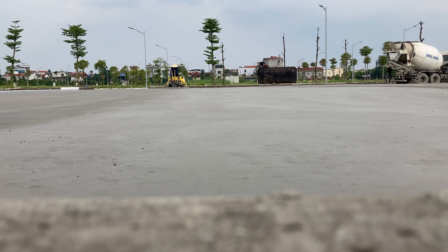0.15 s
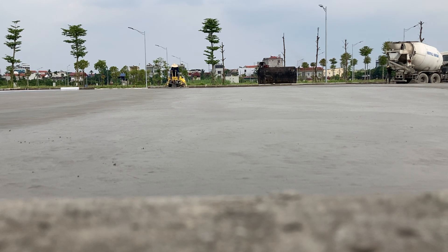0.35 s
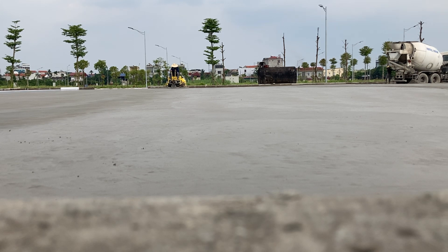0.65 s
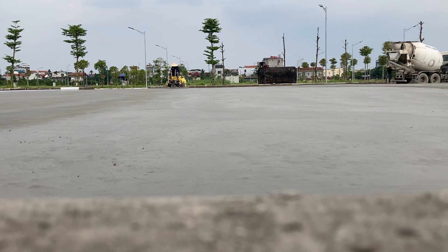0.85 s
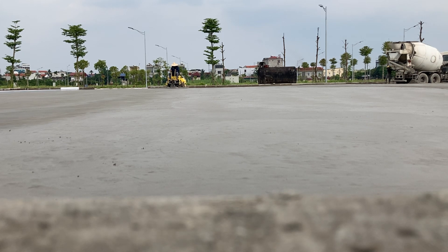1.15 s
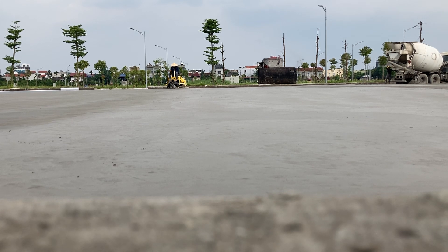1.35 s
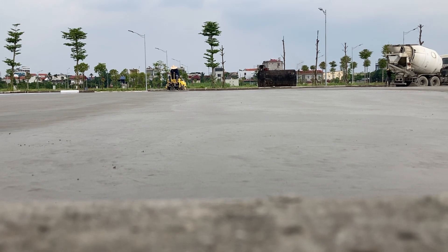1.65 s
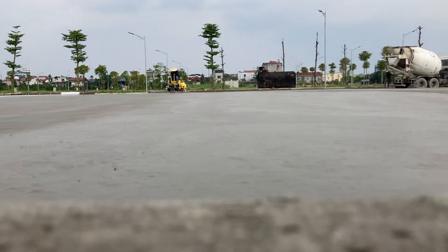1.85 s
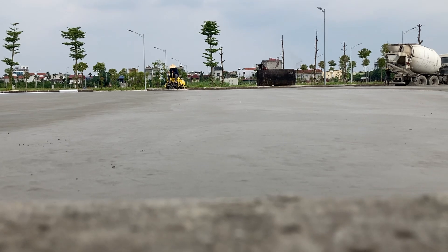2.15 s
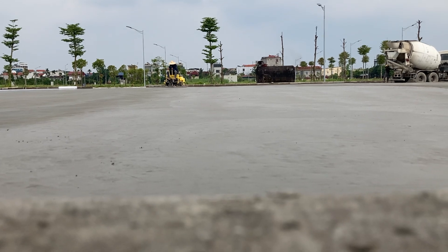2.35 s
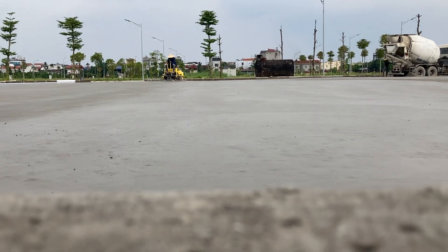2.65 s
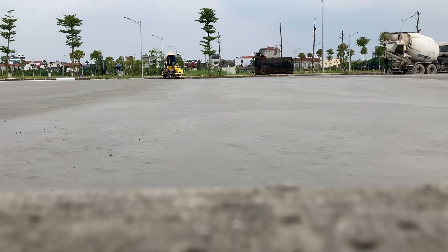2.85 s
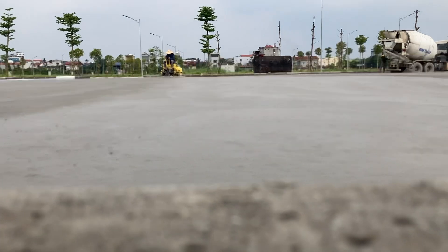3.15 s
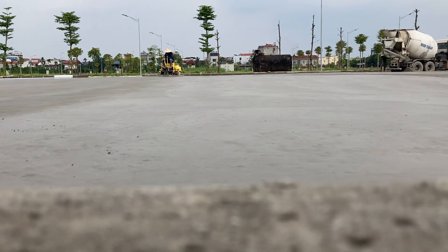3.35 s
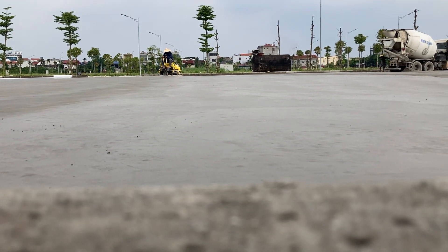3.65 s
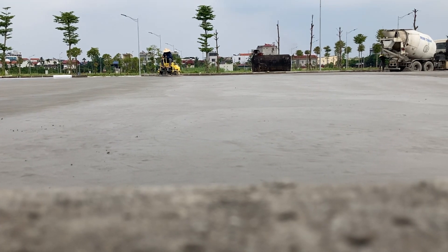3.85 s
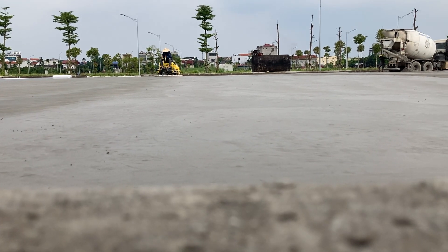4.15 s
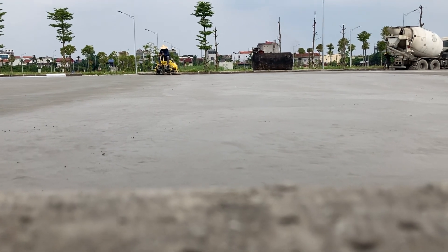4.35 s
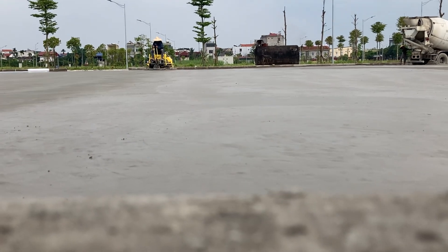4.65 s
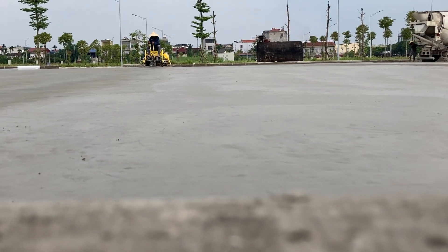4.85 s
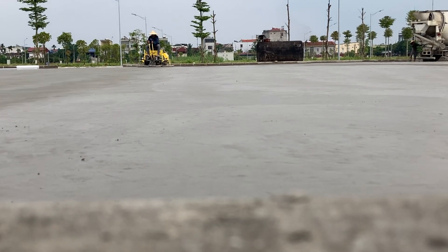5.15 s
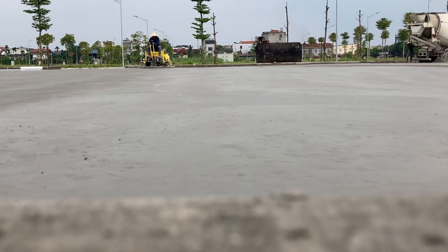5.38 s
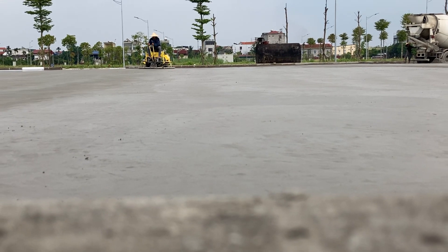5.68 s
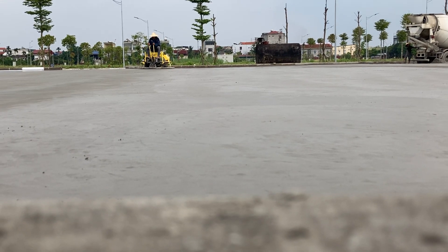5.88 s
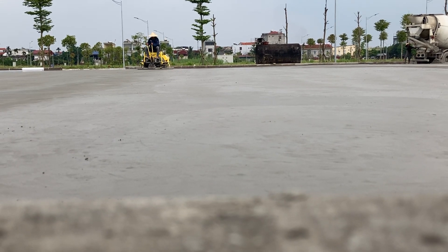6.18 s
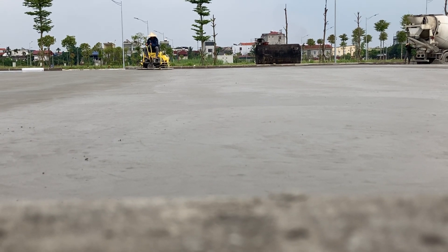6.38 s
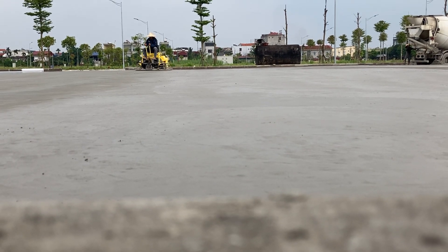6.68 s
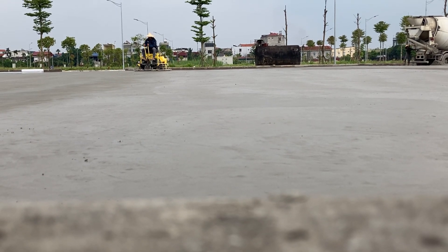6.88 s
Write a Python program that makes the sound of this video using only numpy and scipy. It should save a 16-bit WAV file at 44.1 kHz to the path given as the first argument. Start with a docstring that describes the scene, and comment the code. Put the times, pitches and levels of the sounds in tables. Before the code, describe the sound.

Outdoors on a wide concrete slab, a mixer lorry's diesel idles continuously with a low throb, broad roar, quick valve ticks and loose steel rattle. A ride-on trowel farther away adds a small-engine drone, a wavering whine and thin scraping hiss. Two brief rustles pass early; a hard slump with lumps knocking the drum comes just after two seconds, softer ones after four and six. Stereo microphone, low and distant.

```python
"""A ride-on trowel works a concrete slab far off: engine drone, a wavering pump whine, scraping blades.
From the start a mixer lorry idles nearer by: diesel throb and roar, valve ticks and rattling steel.
Around one second the mix slumps, and the roar's colour changes over the next second. Two rustles pass.
Just after two seconds the mix slumps hard and lumps knock on the drum; more follow after four and six.
Tones, shaped noises and decaying rings make it all; two microphone ports hear it, the left mostly late."""
import sys
import numpy as np
from scipy import signal
from scipy.fft import rfft, irfft, next_fast_len
from scipy.io import wavfile
from scipy.ndimage import uniform_filter1d, map_coordinates

SR = 44100
rng = np.random.default_rng(int(sys.argv[2]) if len(sys.argv) > 2 else 0)


def unload_wav(signal):
    """Save mono or channel-first audio to the path in sys.argv[1] as 16-bit WAV at rate SR, clipped to [-1, 1]."""
    wavfile.write(
        sys.argv[1],
        SR,
        np.round(np.clip(np.atleast_2d(signal).T, -1, 1) * 32767).astype(np.int16),
    )


N = 309582

# trowel levels over time: time [s], drone_level [dB], whine_change [dB]
TROWEL_LEVELS = [(0, -36.5, 5.5), (1.0, -35.5, 3.5), (1.1, -37, 3.5), (1.35, -41, 1), (1.5, -34, -10),
                 (1.65, -37.5, 1), (2.03, -40, 2), (2.09, -39, -3), (2.3, -38.5, -4), (2.5, -35.5, -1.5),
                 (2.8, -38.5, 1.5), (3.0, -42, 0.5), (3.2, -41, -1.5), (3.42, -39, -6), (3.65, -42, -0.5),
                 (3.82, -41, -3.5), (4.2, -36, 1.5), (4.65, -40.5, 0), (5.0, -35, 2), (5.4, -41, -1),
                 (5.55, -38, -0.5), (6, -40, -0.5), (6.38, -39, 0.5), (6.5, -41, -5.5), (7.02, -38, -1)]
# levels of the broad noises: time [s], roar_level [dB], scrape_level [dB]
NOISE_LEVELS = [(0, -36.5, -50.5), (1.2, -36, -48.5), (1.75, -36, -45.5), (2.6, -35.5, -45.5),
                (3.5, -36, -46.5), (4.35, -36, -45), (4.6, -35.5, -46.5), (5.1, -35.5, -45),
                (6.1, -35, -47.5), (6.45, -35.5, -45), (7.02, -36, -45.5)]
# colour of the scraping blades, also lent to the slumps' hiss: pitch [Hz], relative_level [dB per Hz]
SCRAPE_COLOUR = [(3500, -20), (5000, -1), (6000, -3), (7500, 0), (8700, -1.5), (10000, -4), (12000, -6),
                 (13300, -10), (14400, -13.5), (15800, -14.5)]
# colour of the later roar, its dips set lower by the ground echo, also lent to the slumps' rush:
# pitch [Hz], relative_level [dB per Hz]
LATER_ROAR_COLOUR = [(500, -10), (650, 2.5), (765, -4.5), (850, 1.5), (1150, -2), (1450, 1), (1620, -13.5),
                     (1800, -4), (2050, -4.5), (2280, -10), (2480, -8.5), (3000, -9.5), (4300, -9),
                     (4800, -56), (6500, -17)]


def amp(db):
    """Turn decibels into a gain."""
    return 10 ** (np.asarray(db) / 20)


def unit(x):
    """Scale a sound to rms 1."""
    return x / np.sqrt(np.mean(x ** 2) + 1e-20)


def along(points, hz):
    """Read a curve of (Hz, value) points, joined by straight lines on a log pitch axis."""
    point_hz, values = np.transpose(points)
    return np.interp(np.log(hz + 1), np.log(point_hz + 1), values)


def curves(rows):
    """Join the rows over time: one value per sample for each column after the time."""
    time_s, *columns = np.transpose(rows)
    return [np.interp(np.arange(N) / SR, time_s, column) for column in columns]


def wobble(rate):
    """Draw a smooth random curve with this many knots a second."""
    knots = rng.standard_normal(int(N * rate / SR) + 4)
    return map_coordinates(knots, [np.arange(N) * rate / SR])


def filtered(x, response):
    """Multiply the spectrum of x by a complex response that depends on pitch."""
    length = next_fast_len(N + SR // 4)
    hz = np.fft.rfftfreq(length, 1 / SR)
    return irfft(rfft(x, length) * response(hz), length)[..., :N]


def noise(spectrum, patchy_db=2):
    """Make two unrelated patchy noises of one colour: the direct sound and what the site scatters."""
    low_edge = [(1, -120), (spectrum[0][0] * .7, -70)]
    high_edge = [(spectrum[-1][0] * 1.3, -70)]
    closed = low_edge + list(spectrum) + high_edge
    z = signal.stft(rng.standard_normal((2, N)), nperseg=1024)[2]
    # smoothing chance values over pitch and then time leaves patches of strength
    field = uniform_filter1d(rng.standard_normal(z.shape[1:]), size=4, axis=0)
    field = uniform_filter1d(field, size=5, axis=1)
    patchy = z * amp(patchy_db * unit(field))
    pair = signal.istft(patchy, nperseg=1024)[1][:, :N]
    return unit(filtered(pair, lambda hz: amp(along(closed, hz))))


def tone(hz, blur, flutter_db, rate, start=None):
    """Make a partial whose phase and size the air stirs: direct, and weaker scattered."""
    start = rng.random() if start is None else start
    phase = 2 * np.pi * (np.cumsum(hz) / SR + start) + blur * wobble(rate)
    size = np.sqrt(2) * amp(flutter_db * wobble(rate))
    return size * np.array([np.sin(phase), 0.72 * np.cos(phase + 3 * wobble(2.7))])


def trowel():
    """Drone with two engine orders; scrape with a restless hiss, low and high parts each on their own."""
    # small engine: time [s], firing_rate [Hz]
    firing = [(0, 63.3), (.9, 64.2), (1.2, 65.6), (1.6, 65), (1.95, 66.8), (2.3, 65.2), (2.9, 68.3),
              (3.4, 65.2), (3.9, 65.8), (4.3, 67), (5.4, 66.3), (5.8, 68), (7.02, 67.9)]
    second_order_db = -47
    hz = curves(firing)[0]
    drone_db = curves(TROWEL_LEVELS)[0]
    scrape_db = curves(NOISE_LEVELS)[1]
    drone = amp(drone_db) * tone(hz, blur=0.51, flutter_db=1.0, rate=9)
    drone = drone + amp(second_order_db) * tone(2 * hz, blur=0.52, flutter_db=2.5, rate=6.4)

    def grit():
        restless_db = 0.89 * wobble(17) + 0.84 * wobble(40) + 0.98 * wobble(400)
        return amp(restless_db) * noise(SCRAPE_COLOUR, patchy_db=2.5)

    def high_share(hz):
        return np.clip((hz - 7500) / 3000, 0, 1)

    low_hiss = filtered(grit(), lambda hz: np.sqrt(1 - high_share(hz)))
    high_hiss = filtered(grit(), lambda hz: np.sqrt(high_share(hz)))
    return drone + amp(scrape_db) * unit(low_hiss + high_hiss)


def piston_rates():
    """Let the pump's speed hunt: both rates swing smoothly between their turning points."""
    # turning points: time [s], piston_rate [Hz], rate of a second shaft that slips behind [Hz]
    turning_points = [(0, 188.8, 187), (.42, 194.3, 191), (0.76, 191.3, 189), (1.2, 199.6, 196.6),
                      (1.48, 197.7, 196.4), (1.92, 201.8, 198.8), (2.3, 196.9, 196.9), (2.85, 205.8, 203),
                      (3.42, 198.2, 197.2), (3.821, 198.7, 197.6), (4.24, 203, 199), (4.66, 198.8, 196),
                      (5.03, 202.4, 198.8), (5.37, 198.6, 196), (5.84, 205.8, 202.5), (6.24, 201.1, 197.8),
                      (6.63, 204.9, 201.3), (6.92, 201.8, 198.8), (7.02, 204, 199.5)]
    swing = 0.54  # how much the speed lingers at each turning point, 0-1
    time_s, *turning_hz = np.transpose(turning_points)
    points = np.arange(len(time_s))
    place = np.interp(np.arange(N) / SR, time_s, points)
    lingering = place - np.sin(2 * np.pi * place) / (2 * np.pi) * swing
    return [np.interp(lingering, points, hz) for hz in turning_hz]


def pump():
    """Sound multiples of the piston rate: a clear whine over fuzzier hums, two of them beating."""
    # the whine is loud only where its pitch meets a narrow resonance: whine_pitch [Hz], level [dB]
    resonance = [(1134, -51.5), (1156, -46.5), (1176, -51), (1185, -45), (1188, -44), (1193, -37.5),
                 (1209, -32.5), (1224, -35), (1236, -38)]
    # hums: time [s], level at 3x [dB], level at 2x of the slower shaft [dB], level at 12x [dB],
    # roughness [0-1]
    hum_levels = [(0, -37, -53, -55, 0.05), (.35, -36.5, -40, -52, 0.14), (.9, -36.5, -39.5, -53, 0.08),
                  (1.2, -42, -48, -45, 0.33), (1.5, -42.5, -48, -56, 0.24), (2, -42.5, -44.5, -48, 0.34),
                  (2.35, -42.5, -46.5, -58, 0.3), (2.9, -41, -37.5, -45, 0.16),
                  (3.3, -39.5, -46.5, -49, 0.37), (3.8, -43.5, -45, -51.5, 0.34),
                  (4.3, -40, -42.5, -47, 0.1), (4.7, -44.5, -47.5, -54, 0.4), (5.2, -40.5, -43, -52, 0.05),
                  (5.8, -42.5, -41.5, -54, 0.26), (6.4, -41.5, -44, -52, 0.1),
                  (7.02, -40, -45.5, -53.5, 0.4)]
    # the second shaft's hum joins after a second: time [s], level against the first shaft's [dB]
    second_shaft = [(0, -16), (.9, -16), (1.15, -1), (7.02, -1)]
    hz, slow_hz = piston_rates()
    third_db, second_db, high_db, rough = curves(hum_levels)
    slow_third_db = third_db + curves(second_shaft)[0]
    whine_db = along(resonance, 6 * hz) + curves(TROWEL_LEVELS)[1]

    whine = amp(whine_db) * tone(6 * hz, blur=0.4, flutter_db=1.0, rate=22)
    third = amp(third_db) * tone(3 * hz, blur=2.1 * rough, flutter_db=6.8 * rough, rate=25)
    slow_third = amp(slow_third_db) * tone(3 * slow_hz, blur=1.9 * rough, flutter_db=4.6 * rough, rate=25)
    slow_second = amp(second_db) * tone(
        2 * slow_hz, blur=0.62 + 1.0 * rough, flutter_db=1.5 + 6.1 * rough, rate=22)
    high = amp(high_db) * tone(12 * hz, blur=1.2, flutter_db=3.5, rate=140)
    return whine + third + slow_third + slow_second + high


def rustle():
    """Let grainy middle-band noise rise quickly and die away, once for each rustle."""
    # rustles: start [s], level [dB], time to fall 60 dB [s]
    events = [(.878, -41, .14), (1.48, -34.5, .3)]
    # pitch [Hz], relative_level [dB per Hz]
    rustle_colour = [(1200, -8), (1700, 0), (2200, 2), (2900, 2), (3800, 2.5), (4500, -12)]
    start_s, level_db, t60_s = np.transpose(events)[..., None]
    since_s = np.clip(np.arange(N) / SR - start_s, 0, None)
    grains = noise(rustle_colour) * amp(2.2 * wobble(150))
    swells = amp(level_db - 60 * since_s / t60_s) * (1 - np.exp(-since_s / 0.0087))
    return np.sum(swells, 0) * grains


def knocks():
    """Let each lump that strikes the drum wall give it one low, quickly damped swing."""
    # lumps: start [s], pitch [Hz], level before damping [dB], time to fall 60 dB [s]
    lumps = [(1.05, 72.4, -28, 0.16), (2.052, 72.5, -27, 0.1), (2.064, 420, -20, .03),
             (2.083, 125, -15, 0.04), (2.131, 297, -13, 0.05), (2.176, 135, -13, 0.05),
             (2.205, 278, -19, 0.066), (4.16, 330, -25, .1), (4.5, 590, -22, .04), (4.96, 335, -24, .1),
             (6.74, 66.25, -28, 0.2)]
    start_s, hz, level_db, t60_s = np.transpose(lumps)[..., None]
    since_s = np.clip(np.arange(N) / SR - start_s, 0, None)
    size = amp(level_db - 60 * since_s / t60_s) * (1 - np.exp(-since_s / 0.002))
    direct = np.sum(size * np.sin(2 * np.pi * hz * since_s), 0)
    return np.array([direct, 0.34 * direct])  # the second is the scattered share


def slumps():
    """Drop wet mix in the drum: a dull thud, a rush and a hiss under one swell."""
    # slumps: start [s], rise [s], time to fall 60 dB [s], then levels before the swell:
    # thud [dB], rush [dB], hiss [dB]
    drops = [(1.03, 0.033, 0.6, -26, -55, -62), (2.051, 0.014, 0.29, -22, -23.5, -30),
             (2.115, 0.013, 0.69, -30, -37, -50), (4.33, 0.068, 0.83, -30, -29.5, -54),
             (6.62, 0.068, 0.89, -26.5, -29, -56)]
    # pitch [Hz], relative_level [dB per Hz]
    thud_colour = [(40, -22), (70, -12), (150, -2), (250, 3), (330, 3), (450, 2), (900, -4), (1300, -20)]
    t = np.arange(N) / SR
    energy = np.zeros((3, N))
    for start_s, rise_s, t60_s, *levels_db in drops:
        since_s = np.clip(t - start_s, 0, None)
        swell = (1 - np.exp(-since_s / rise_s)) * amp(-60 * since_s / t60_s)
        energy += (amp(levels_db)[:, None] * swell) ** 2
    colours = (thud_colour, LATER_ROAR_COLOUR, SCRAPE_COLOUR)
    layers = sum(np.sqrt(e) * noise(colour) for e, colour in zip(energy, colours))
    return amp(0.83 * wobble(99)) * layers


def tick_rows():
    """List the loud ticks, and fill the turns between them with faint ones of chance size."""
    # loud valve ticks: start [s], snap_level [dB], ring_level [dB], both before the plate's colouring
    loud_ticks = [(0.0927, -38, -54), (0.4753, -41, -41), (0.626, -37, -50), (0.7323, -33, -43.5),
                  (0.8814, -39, -38), (1.0306, -40, -42), (1.1029, -38, -50), (1.1767, -41, -47),
                  (1.2498, -37, -36), (1.3229, -33, -49.5), (1.4229, -35, -44.5), (1.5429, -38, -48),
                  (1.616, -36, -42), (1.6881, -34, -45), (1.763, -32, -38), (1.836, -34, -38),
                  (1.9086, -33, -43.5), (2.0095, -40.5, -40), (2.0557, -43, -47), (2.2057, -37, -26),
                  (2.2783, -37, -33), (2.352, -36, -47), (2.427, -38, -32), (2.5002, -34, -28.5),
                  (2.6473, -36, -27.5), (2.7935, -33, -33), (3.038, -41, -36), (3.2313, -34, -46.5),
                  (3.3802, -44, -47), (3.6353, -43, -47), (3.9858, -44, -39), (4.3064, -50, -33.5),
                  (4.375, -38, -40), (4.4538, -33, -43), (4.5271, -43, -51), (4.6007, -35, -49),
                  (4.892, -38, -46), (4.9656, -35, -46), (5.04, -31, -43.5), (5.111, -35, -41),
                  (5.187, -30, -36), (5.26, -34, -44.5), (5.3329, -37, -48), (5.4051, -39, -50),
                  (5.6975, -40, -40), (5.775, -35, -38), (5.85, -35, -35), (5.9295, -40, -29.5),
                  (5.996, -33.5, -34), (6.2919, -44, -46), (6.3943, -35, -45.5), (6.4425, -35, -48.5),
                  (6.5146, -35, -39), (6.5896, -32.5, -38), (6.7416, -42, -36.5), (6.9865, -36.5, -53.5)]
    ticks_per_s = 13.62  # one a turn of the shaft
    faint_snap_db, faint_ring_db, faint_spread_db = -42, -50, 3.5
    loud_s = np.transpose(loud_ticks)[0]
    gaps = []
    for a, b in zip(loud_s, loud_s[1:]):
        turns = max(round((b - a) * ticks_per_s), 1)
        gaps.append(np.linspace(a, b, turns + 1)[1:-1])
    faint_s = np.concatenate(gaps)
    spread = faint_spread_db * rng.standard_normal((len(faint_s), 2))
    faint_db = [faint_snap_db, faint_ring_db] + spread
    return np.vstack([loud_ticks, np.column_stack([faint_s, faint_db])])


def ticks():
    """Make each valve tick snap, short and sharp, ring a cover plate and jingle a thin part."""
    # a ring, then two snaps: pitch [Hz], time to fall 60 dB [s]
    valve = [(3832, 0.05), (4250, 0.02), (4520, 0.028)]
    # thin part shaken by each tick: pitch [Hz]
    jingle_hz = [10850, 11400, 11870, 12250]
    jingle_db, jingle_t60_s = -20, 0.07  # average level against the snap
    # gain of each of the two snaps
    snap_shares = [2.4, 1.1]
    snap_rise_s, ring_rise_s = .0015, 0.0032
    out = np.zeros(N + SR)
    t = np.arange(SR // 10) / SR
    waver = amp(3 * wobble(250))

    def swing(hz, t60_s):
        return amp(-60 * t / t60_s) * np.sin(2 * np.pi * (hz * t + rng.random()))

    for start_s, snap_db, ring_db in tick_rows():
        first = round(start_s * SR)
        ring, *snaps = (swing(hz, t60_s) for hz, t60_s in valve)
        crack = 1.06 * amp(-60 * t / 0.13) * rng.standard_normal(len(t))
        jingle = sum(amp(jingle_db + 5 * rng.standard_normal()) * swing(hz, jingle_t60_s)
                     for hz in jingle_hz)
        loose = np.roll(waver, -first)[:len(t)]
        shaken = (amp(ring_db) * ring + amp(snap_db) * jingle) * loose
        snap = amp(snap_db) * (loose * (snap_shares @ np.array(snaps)) + crack)
        soft_ring = (1 - np.exp(-t / ring_rise_s)) * shaken
        soft_snap = (1 - np.exp(-t / snap_rise_s)) * snap
        out[first:][:len(t)] += soft_ring + soft_snap

    # pitch [Hz], gain [dB]
    tick_colour = [(1500, -40), (3200, -14), (3800, 4.0), (4300, -7.5), (4800, -9), (5500, -12),
                   (7000, -24), (9000, -44), (11000, 4.5), (16000, -57)]
    aside_s = np.array([[-1], [1]]) * 22e-6  # further right: left port later, right port earlier
    return filtered(out[:N], lambda hz: amp(along(tick_colour, hz)) * np.exp(2j * np.pi * hz * aside_s))


def diesel():
    """Sum exhaust orders, noises that throb with the firings, and steel rattled at each of them."""
    # lorry engine: time [s], firing rate of one bank [Hz]
    firing = [(0, 20.0), (.6, 19.75), (1.1, 20.4), (1.8, 20.35), (2.7, 20.55), (3.6, 20), (4.2, 20.25),
              (4.8, 20.5), (5.5, 20.4), (6.3, 20.25), (7.02, 20.35)]
    # exhaust orders: multiple of the firing rate, relative_level [dB]
    exhaust = [(2, -14), (3, -11), (4, -4.5), (5, 3), (6, -34), (7, -2.5), (8, -0.5), (9, -4), (10, -5.5),
               (12, -19), (14, -28), (16, -10)]
    # time [s], gain on all exhaust orders [dB], rumble_level [dB]
    throb = [(0, -43, -36), (1, -43.5, -34), (2.5, -42.5, -34.5), (4, -42.5, -35.5), (5, -41.5, -34),
             (6, -42.5, -34.5), (7.02, -41, -33)]
    # how the roar's colour changes: time [s], share of the later roar [0-1]
    later_share = [(0, 0.099), (1, 0.03), (2, 1), (7.02, 0.84)]
    # colours of rumble, early roar and injector spits: pitch [Hz], relative_level [dB per Hz]
    rumble_colour = [(25, -30), (32, -24), (42, -19), (60, -16), (100, -6), (140, -5), (200, -10),
                     (350, -9.5), (600, -13.5), (760, -24), (1200, -31.5)]
    early_roar_colour = [(500, -9.5), (700, -1.5), (810, -10), (930, -2.5), (1150, -3), (1390, -7.5),
                         (1560, -3.5), (1750, -14.5), (1950, -8), (2250, -15), (2450, -15), (3000, -13.5),
                         (4300, -14.5), (4800, -21), (6500, -22.5)]
    spit_colour = [(3300, -17), (3900, -24), (4300, -15), (4550, 18), (5000, -41)]
    # loose steel: pitch [Hz], width [Hz], relative_level [dB]
    loose_steel = [(1960, 60, 9), (2455, 50, 11), (3480, 60, 4), (4521, 50, 3), (4888, 50, 4),
                   (5060, 50, -1), (5512, 50, -2), (6352, 50, -1), (7450, 60, -1), (8118, 50, 2),
                   (8419, 50, 2), (9388, 40, 3), (9539, 40, 6), (10206, 50, -4), (10852, 50, -2),
                   (11864, 50, -4), (12187, 50, -4), (12446, 50, -3), (13178, 60, -5), (14793, 60, -9)]
    # two steady low hums: pitch [Hz], level [dB]
    steady_hums = [(53.6, -49), (73, -52.5)]
    rattle_db, spit_db = -51.5, -57.5
    pipe_smear = 0.02004  # turns of delay per order squared

    (hz,), (throb_db, rumble_db) = curves(firing), curves(throb)
    roar_db = curves(NOISE_LEVELS)[0]
    later = np.clip(curves(later_share)[0], 0, 1)
    cycle = np.cumsum(hz) / SR
    fire = amp(-9 * (2 * cycle % 1))  # both banks: a sharp start, then a fall
    turn = amp(-4 * (2 / 3 * cycle % 1))  # one cylinder a turn knocks harder

    # the orders line up as pulses smeared by the pipe, no two alike
    orders = sum(amp(db) * tone(k * hz, blur=0.24, flutter_db=1.04, rate=5, start=pipe_smear * k * k)
                 for k, db in exhaust)
    orders = orders * amp(1.5 * wobble(40))
    hums = sum(amp(db) * tone(np.full(N, hum_hz), blur=0.44, flutter_db=5.0, rate=4.1)
               for hum_hz, db in steady_hums)

    rumble = noise(rumble_colour, patchy_db=1.4) * fire ** 0.096 * amp(0.6 * wobble(9))
    early_roar = np.sqrt(1 - later) * noise(early_roar_colour, patchy_db=2.5)
    later_roar = np.sqrt(later) * noise(LATER_ROAR_COLOUR, patchy_db=2.0)
    roar_waver = amp(0.49 * wobble(10) + 0.54 * wobble(120))
    roar = (early_roar + later_roar) * fire ** 0.048 * roar_waver
    # a short spit at each injection
    spits = noise(spit_colour) * fire ** 2.5 * amp(3.5 * wobble(35))

    def shake():
        return rng.standard_normal((2, N)) * fire * turn * amp(2.2 * wobble(5) + 3 * wobble(14))

    def rings(part, f):
        total = 0
        for k, (centre, width, db) in enumerate(part):
            resonance = 1j * f * width / (centre * centre - f * f + 1j * f * width)
            total = total + amp(db) * resonance * (-1) ** k  # neighbours swing opposite ways
        return total

    # three parts, each loose in its own way
    steel = sum(filtered(shake(), lambda f: rings(loose_steel[k::3], f)) for k in range(3))
    tones = amp(throb_db) * orders + hums
    noises = amp(rumble_db) * unit(rumble) + amp(roar_db) * unit(roar) + amp(spit_db) * unit(spits)
    return tones + noises + amp(rattle_db) * unit(steel)


def scene():
    """Put direct plus scattered sound on the left, direct minus scattered on the right; add the ticks."""
    # how alike the two ports sound: pitch [Hz], likeness [0-1]
    alike = [(60, .98), (260, .93), (500, .82), (780, .45), (1400, .8), (2600, .65), (4300, .85),
             (6000, .75), (7100, .93), (16000, .9)]
    pair = trowel() + pump() + rustle() + knocks() + slumps() + diesel()

    def shares(hz):
        angle = np.arccos(np.clip(along(alike, hz), 0, 1)) / 2
        return np.array([np.cos(angle), np.sin(angle)])

    direct, scattered = filtered(pair, shares)
    return np.array([direct + scattered, direct - scattered]) + ticks()


def record(dry):
    """Let the ports differ in level and phase, and keep nothing above the band limit."""
    # left over right: pitch [Hz], level_difference [dB]
    tilt = [(60, -4), (200, 0.5), (400, -1.5), (650, -4), (1000, -0.5), (1200, -1.5), (1800, 2), (2900, 3),
            (3900, 1), (6000, -3.5), (7000, 1), (16000, 1)]
    # left behind right: pitch [Hz], phase_lag [radians]
    lag = [(20, -.1), (200, 0), (500, .8), (1200, 1.1), (2200, 1.1), (3450, 3.2), (3850, 3.6), (4700, 3.4),
           (5600, 3.85), (7100, 6.28), (9100, 9.42), (11400, 12.57), (13650, 15.71), (15500, 18.85),
           (17000, 21)]
    top_hz = 15760

    def ports(hz):
        # each port takes half the difference, in opposite directions
        half = amp(along(tilt, hz) / 2) * np.exp(-.5j * np.interp(hz, *np.transpose(lag)))
        return np.array([half, 1 / half]) * (hz < top_hz)

    return filtered(dry, ports)


dry = scene()
out = record(dry)
unload_wav(out)
```